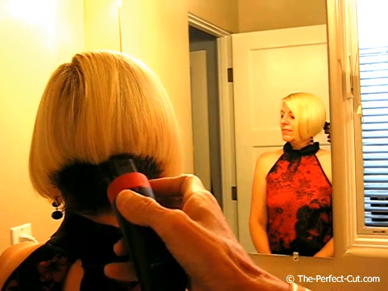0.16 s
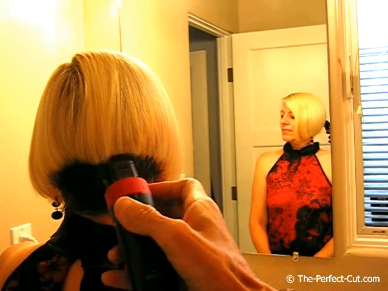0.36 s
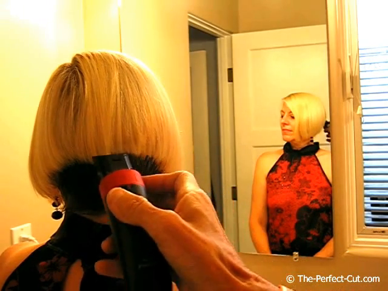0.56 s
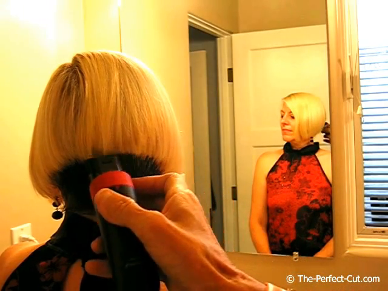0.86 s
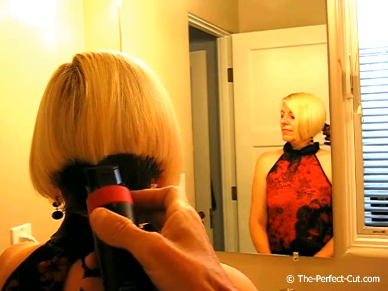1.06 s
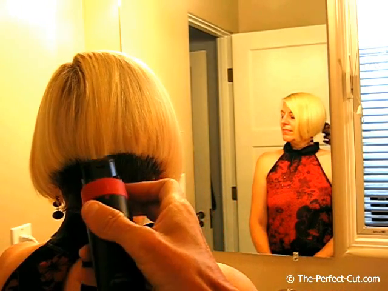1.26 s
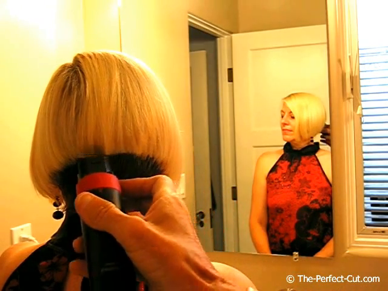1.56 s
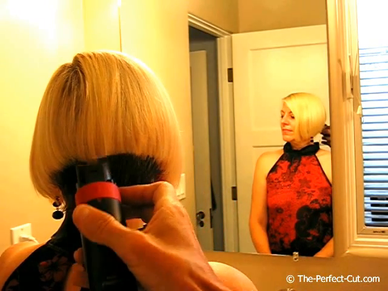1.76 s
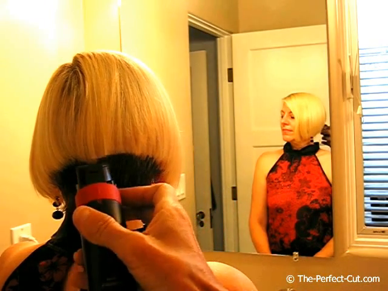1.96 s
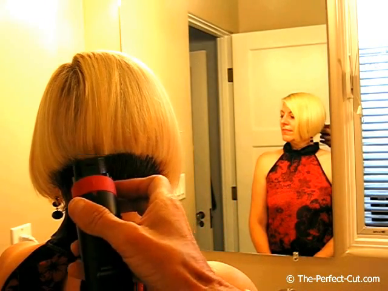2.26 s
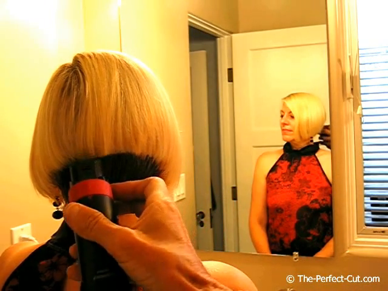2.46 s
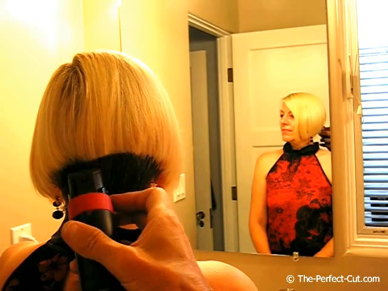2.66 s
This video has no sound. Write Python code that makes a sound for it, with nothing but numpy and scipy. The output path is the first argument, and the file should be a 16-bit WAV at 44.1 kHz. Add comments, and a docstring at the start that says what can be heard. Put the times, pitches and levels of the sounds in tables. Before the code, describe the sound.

Electric hair clippers buzz steadily up close, rasping briefly as they bite into hair.

```python
"""Cordless hair clippers buzz at the nape, close to the microphone in a small bathroom.
A motor near 100 turns a second rocks the blade; four times the blade bites into hair,
the motor sags and the buzz roughens. The microphone is a small camera's, which samples slowly
without a guard filter, so the high overtones fold back as a second, mirrored comb of tones."""
import sys
import numpy as np
from scipy import signal
from scipy.fft import rfft, irfft
from scipy.io import wavfile
from scipy.ndimage import uniform_filter1d

SR = 44100
rng = np.random.default_rng(int(sys.argv[2]) if len(sys.argv) > 2 else 0)


def bounce(signal):
    """Save signal as a 16-bit WAV file at the path given by the first command-line argument."""
    frames = np.transpose(np.atleast_2d(signal))
    limited = np.clip(frames, -1, 1)
    pcm = np.round(limited * 32767).astype(np.int16)
    wavfile.write(sys.argv[1], SR, pcm)


N = 123479


# The buzz at the microphone. Each row: multiple of the motor's turning rate, base level in dB.
OVERTONES = [(1, -64), (2, -74), (3, -72), (4, -59), (5, -57), (6, -66), (7, -62), (8, -64), (9, -49),
             (10, -51), (11, -42), (12, -47), (13, -54), (14, -53), (15, -59), (16, -65), (17, -52),
             (18, -54), (19, -52), (20, -56), (21, -48), (22, -62), (23, -47), (24, -51), (25, -45),
             (26, -54), (27, -45), (28, -53), (29, -50), (30, -54), (31, -50), (32, -50), (33, -54),
             (34, -51), (35, -51), (36, -49), (37, -57), (38, -49), (39, -52), (40, -53), (41, -53),
             (42, -54), (43, -50), (44, -55), (45, -50), (46, -56), (47, -54), (48, -59), (49, -57),
             (50, -55), (51, -58), (52, -61), (53, -57), (54, -57), (55, -61), (56, -55), (57, -60),
             (58, -59), (59, -62), (60, -65), (61, -60), (62, -59), (63, -59), (64, -59), (65, -61),
             (66, -58), (67, -56), (68, -63), (69, -55), (70, -58), (71, -55), (72, -55), (73, -56),
             (74, -60), (75, -51), (76, -55), (77, -47), (78, -54), (79, -52), (80, -54), (81, -54),
             (82, -58), (83, -52), (84, -58), (85, -52), (86, -55), (87, -54), (88, -60), (89, -52),
             (90, -57), (91, -58), (92, -60), (93, -62), (94, -59), (95, -63), (96, -58), (97, -61),
             (98, -55), (99, -52), (100, -59), (101, -57)]

def buzz(turns, load):
    """The rocking blade: sines loosely lined up into knocks; load makes them waver and smear."""
    orders, base_db = np.transpose(OVERTONES)
    samples, frames = np.arange(N), np.arange(0, N + 128, 128)
    t, shape = frames / SR, (len(orders), len(frames))
    frame_load = np.interp(frames, samples, load)
    nominal_hz = orders * MOTOR_SPEED[0][1]
    top_db = -4 * np.clip((orders - 84) / 8, 0, 2)  # the highest overtones are weaker still
    level_db = (base_db + top_db)[:, None] + .7 * drift(shape, span=70)
    level_db += 1.2 * frame_load * drift(shape, span=8)
    level_db += stroke_balance(orders, nominal_hz, t) + buzz_colour(nominal_hz, t) + choke(orders, t)
    phases = (.05 + .3 * frame_load) * drift(shape, span=4)
    blur_rad = .3 + .017 * orders + np.pi * (orders >= 56)  # from 56 up they no longer join the knock
    sweep_rad = np.pi * .017 * orders ** 2  # spreads each knock out in time
    phases += (blur_rad * rng.standard_normal(len(orders)) - sweep_rad)[:, None]
    tones = np.zeros(N)
    for order, gain, phase in zip(orders, amp(level_db), phases):
        angle = 2 * np.pi * order * turns + np.interp(samples, frames, phase)
        tones += np.interp(samples, frames, gain) * np.cos(angle)
    return np.sqrt(2) * tones


# The motor's pace. Each row: time in seconds, turns per second.
MOTOR_SPEED = [(0, 100.82), (.12, 100.8), (.16, 100.34), (.22, 100.1), (.285, 99.42), (.37, 100.15),
               (.52, 100.47), (.74, 100.39), (.86, 100.43), (.93, 100.05), (1.0, 99.38), (1.08, 99.02),
               (1.19, 100.01), (1.29, 100.01), (1.36, 100.13), (1.48, 99.99), (1.56, 99.94), (1.66, 100.0),
               (1.77, 98.58), (1.86, 98.2), (1.95, 99.42), (2.07, 99.7), (2.2, 99.5), (2.36, 99.5),
               (2.44, 99.34), (2.55, 99.48), (2.64, 98.52), (2.72, 99.31), (2.8, 99.3)]
# Hair between the blades. Each row: time in seconds, cutting load from 0 to 1.
HAIR_LOAD = [(0, .3), (.12, .2), (.155, .95), (.19, .45), (.245, 1), (.275, .4), (.33, .5), (.38, .15),
             (.89, .05), (.945, .9), (1.0, .7), (1.07, .7), (1.18, .25), (1.3, .05), (1.66, 0), (1.72, .75),
             (1.79, .7), (1.85, .9), (1.93, .3), (2.0, 0), (2.57, .1), (2.61, .7), (2.67, .6), (2.71, .1),
             (2.8, .05)]

def motor():
    """The motor sags at each bite: returns the turns made so far and the load on the blade."""
    t = np.arange(N) / SR
    turns = np.cumsum(np.interp(t, *np.transpose(MOTOR_SPEED))) / SR
    load = np.clip(np.interp(t, *np.transpose(HAIR_LOAD)), 0, 1)
    return turns, load


# Balance of the two blade strokes. Each row: time in seconds, gain of the even overtones in dB.
STROKE_BALANCE = [(0.06, -0.5), (0.17, 0.8), (0.24, 3), (0.3, 2.2), (0.4, -1.7), (0.6, 1), (0.85, -3),
                  (1.03, 1), (1.25, 1.5), (1.6, 1.5), (1.72, 1.8), (1.83, 1.5), (1.96, 3), (2.15, 1.9),
                  (2.35, 2.5), (2.52, 1.5), (2.63, 2.3), (2.74, 0.5)]

def stroke_balance(orders, hz, t):
    """The shifting balance of the two strokes lifts or lowers the upper even overtones, in dB."""
    upper_even = (orders % 2 == 0) & (hz > 1900)
    return upper_even[:, None] * np.interp(t, *np.transpose(STROKE_BALANCE))


# Bands of the buzz's overtones that swell and fade. Each row: centre in Hz, width in Hz.
OVERTONE_BANDS = [(910.0, 110.0), (1110.0, 110.0), (1220.0, 110.0), (1410.0, 200.0), (1710.0, 160.0),
                  (1910.0, 160.0), (2120.0, 140.0), (2320.0, 140.0), (2530.0, 140.0), (2730.0, 160.0),
                  (2970.0, 220.0), (3220.0, 180.0), (3420.0, 160.0), (3620.0, 160.0), (3870.0, 260.0),
                  (4120.0, 180.0), (4350.0, 160.0), (4550.0, 160.0), (4930.0, 500.0), (6740.0, 700.0),
                  (7390.0, 300.0), (7700.0, 260.0), (8050.0, 400.0), (8550.0, 500.0), (9050.0, 500.0)]
# The clippers moving along the nape. Each row: time in seconds, then a gain in dB for each band.
BAND_GAINS = [(0.06, 1.5, -4, 4.5, 6.5, 3.5, 3, 2.5, 6.5, -1.5, -3, 0, -8.5, 1.5, -7, 3, -1.5, -5.5, -6, 4.5, 3.5, -3.5, 3, -2, -6.5, -11),
              (0.17, 3, 2.5, -1.5, 2, -6, 6, 4, 2, -2, 3.5, 2, -2, 10, -9, -2.5, 0.5, 4.5, -9.5, 0, 6, 4.5, -6.5, -0.5, -1, -1.5),
              (0.24, 5.5, 0.5, -4, 7.5, -2.0, -0.5, 3.5, 6, -2, 4, 5, 3, 5.5, -2.5, 1, 1, 1, -1.0, -5, 0, -3.5, -4.5, -5.5, -5, -4),
              (0.3, -9, 3.5, -11, 4, 3.5, 0.5, 5.5, 2.5, 0, 1, 6.5, -2.0, -6, -0.0, 3, -0.5, -4, 8.5, -3.0, 1.5, -0.5, -3.5, -2, -1, 0),
              (0.4, -1, 1.5, -3, 3.5, -1.5, -3.5, 4.5, 6.5, 1.5, 3.5, 4.5, 2, 6, -10.5, 3.5, -2, 1.5, -3, -1, 3.5, 1, -2.5, -1.5, -10, 6),
              (0.6, 1.5, 3, 0, 1.5, -5, 5.5, -0.5, 3, 0.5, -1.5, 3.5, -5, 1, -5, -1, 5, 1, -3.5, 7, 3, -0.5, 0.0, 1.5, -0.5, 2),
              (0.85, 1, 3, 1.5, 2, -8.5, 0.5, 1.5, 5.5, 2.5, 0.5, 3.5, 2, 8, -4, 1.5, -2, 3, -3, 0.5, 1.5, 2.5, -1.0, -3.5, -7, 1),
              (1.03, -4.5, 3, -5, 5, 2.5, -2.5, 2, -0.5, 3.5, 2, 4, 3, -3, -2, -2, -3, 1, 4.5, -1, -3.5, 9, -7, -2, -9, 8.5),
              (1.25, -3, 1.5, 2, 0.5, -0.5, 0, -3.0, 1.5, 3.5, 3.0, 0.5, 1.5, -2, -6, -2.5, 7, -6.5, 1.5, -2, -3.5, 6, 1.5, -7.5, -5.5, 0),
              (1.6, -3, 0, 3.5, -4, -3, 3, -10.0, -1.5, 2, 2.5, -2, 0, 2, 3.5, -2, 5, -2.5, 2.5, 1, -2, -5, 10, -11.5, -2, 0),
              (1.72, -5.0, 2.5, -7.5, 0, 1, 2, -2, -9, 3.5, 2, 2.5, 4, 4, -1, -0.5, 5, 1, 4, -7.0, -7.5, -3, -3, -7, -9, 6),
              (1.83, -8, 0, -7, 5, 4.5, -4, 4, -9, -5, -7, 7, -1.5, -8, -8, 2, 3, 0.5, 3, 1.0, 0, 3, -1, -1.5, 7, 5),
              (1.96, -4.5, 2, -2.5, -3.0, 4.5, 0.5, -6.5, -0.5, -0.5, 0.5, -2, 3, -5, 3.5, -3.5, 0, 2.5, 0.5, -1.5, -5, 0.5, -0.5, -2, -4, 6),
              (2.15, -3, 2, 0, -3.5, 7.5, -1.5, -1.5, -3.5, 2.5, 1.5, -12.5, -3, -7, 2, -1, 2, -4, 3, 1, -1, -2.5, 3.5, 4.5, 0, -2.5),
              (2.35, -2.5, 2, -5, -2.5, 6.5, 0.5, -2.5, -3.5, 1.5, -1, -0.5, 1.0, -4, 3.5, 1, 0, -0.5, 3, 2, -4, -2, 1.5, 0.5, -2.5, 3),
              (2.52, -2.5, 2, -3.5, -3.5, 5, 1.5, -5.5, -5.5, -0.5, -2, -0.5, 1, 2, 7, 0.5, -3.5, 1, 5, -1, -8, 4, -3.5, 0.5, 6, 2),
              (2.63, -6, 0, -2.5, 1.5, 5.5, -3.0, -3.5, -11, 1, -3.5, 10, -9.5, -5.5, -6, 5, -4, 5, 3, -1.0, -2, -3, 0, -4.0, 1.0, 1),
              (2.74, -6.5, 1, -0.5, -3.5, 6.5, -0.5, -5, 0, 2, 0.5, -1.0, 1, -1, 1, 3, -6, 5.5, 4, -4, 0, -4, 2, 0, 0, -5)]

def buzz_colour(hz, t):
    """Bands of overtones swell and fade, in dB, as the clippers shift and press into the hair."""
    times, *gains = np.transpose(BAND_GAINS)
    colour_db = np.zeros((len(hz), len(t)))
    for (centre, width), gain_db in zip(OVERTONE_BANDS, gains):
        nearness = np.exp(-.5 * ((hz - centre) / (.5 * width)) ** 2)
        colour_db += nearness[:, None] * np.interp(t, times, gain_db)
    return colour_db


# Patches of thick hair. Each row: start in seconds, length in seconds, dip in dB.
THICK_HAIR = [(1.76, .14, -4), (2.6, .075, -4)]

def choke(orders, t, whine_order=11, edge_s=.012):
    """Thick hair chokes the strongest whine: a brief dip, in dB, on that one overtone."""
    choke_db = np.zeros((len(orders), len(t)))
    for start, length, dip_db in THICK_HAIR:
        inside_s = np.minimum(t - start, start + length - t)
        choke_db[orders == whine_order] += dip_db * np.clip(inside_s / edge_s, 0, 1)
    return choke_db


# Spectrum of blade on blade. Each row: frequency in Hz, relative level in dB.
SCRAPE_SPECTRUM = [(500, -10), (1000, -2), (1700, -2), (2500, -3), (4000, -3), (5000, -4), (5500, -5),
                   (7500, -5), (9500, -8), (12000, -24)]
# Spectrum of snapping hairs. Each row: frequency in Hz, relative level in dB.
SNAP_SPECTRUM = [(500, -24.5), (1000, -9), (1700, -5.5), (2300, -3), (3000, -5.5), (4200, -6.5),
                 (5000, -8.5), (7000, -13), (11000, -21)]

def rasp(turns, load, snaps_per_s=2200, spread_db=3.8):
    """Blade scrapes on blade and hairs snap under load; both throb with each stroke."""
    signs = rng.choice([-1., 1.], N)
    sizes = amp(spread_db * np.minimum(rng.exponential(1, N), 5))
    snaps = signs * sizes * (rng.random(N) < snaps_per_s / SR)
    scrape = amp(-50.5) * coloured(SCRAPE_SPECTRUM)
    cutting = amp(-39) * load * coloured(SNAP_SPECTRUM, snaps)
    throb = 1 + .7 * np.cos(4 * np.pi * turns)  # two strokes a turn
    return throb * (scrape + cutting)


def bathroom(sound, t60_s=.3):
    """Tiled walls near the microphone send back a short tail, starting after 3 ms."""
    t = np.arange(SR // 2) / SR
    tail = rng.standard_normal(len(t)) * amp(-60 * t / t60_s) * (t > .003)
    return signal.fftconvolve(sound, tail / np.linalg.norm(tail))[:N]


# Spectrum of the room tone. Each row: frequency in Hz, relative level in dB.
AIR_SPECTRUM = [(20, -8), (40, 2), (70, -5.5), (120, -4.5), (180, -10.5), (270, -6.5), (400, -9.5),
                (700, -11.5), (1500, -11), (5000, -46)]

def room_tone():
    """The air of the room and the camera's own noise, steady behind the clippers."""
    return amp(-49) * coloured(AIR_SPECTRUM)


def amp(db):
    """dB to gain."""
    return 10 ** (np.asarray(db) / 20)


def unit_rms(x):
    """Scales to rms 1."""
    return x / np.sqrt(np.mean(x ** 2) + 1e-20)


def coloured(spectrum, source=None):
    """White noise, or the given source, filtered by the spectrum and scaled to rms 1."""
    hz, db = np.transpose(spectrum)
    bins_hz = np.fft.rfftfreq(N, 1 / SR)
    gain = amp(np.interp(np.log(bins_hz + 1), np.log(hz), db))
    source = rng.standard_normal(N) if source is None else source
    return unit_rms(irfft(rfft(source) * gain, N))


def drift(shape, span):
    """Random curves of overall rms 1, one per row, smoothed twice over span frames."""
    once = uniform_filter1d(rng.standard_normal(shape), span)
    return unit_rms(uniform_filter1d(once, span))


def scene():
    """At one microphone: the clippers up close, the bathroom's echo and the room tone behind."""
    turns, load = motor()
    clippers = buzz(turns, load) + rasp(turns, load)
    return (clippers + amp(-16) * bathroom(clippers) + room_tone())[None]


def record(dry, step=4, dc_offset=-.0145, edge_hz=7200):
    """The camera keeps every fourth sample unguarded, fills the gaps softly, then cuts the top."""
    kept = step * (dry + dc_offset) * (np.arange(N) % step == 0)
    soft_filter = signal.firwin(51, SR / step / 2, window=("kaiser", 6), fs=SR)
    band_limit = signal.firwin(511, edge_hz, window=("kaiser", 9), fs=SR)
    filled = signal.oaconvolve(kept, soft_filter[None], "same")
    return signal.oaconvolve(filled, band_limit[None], "same")


dry = scene()
out = record(dry)
bounce(out)
```